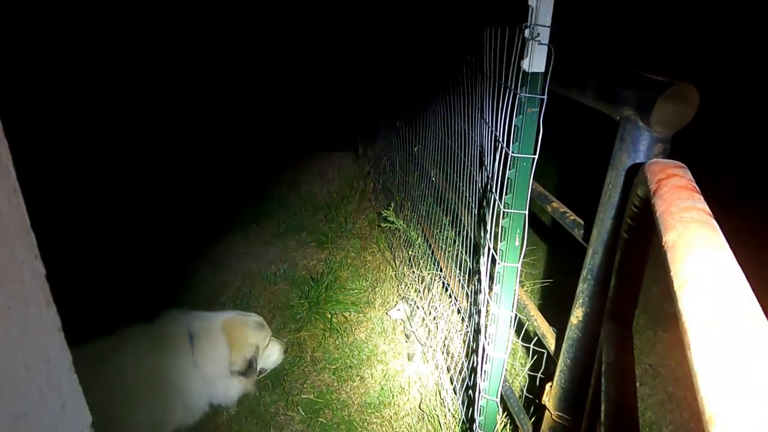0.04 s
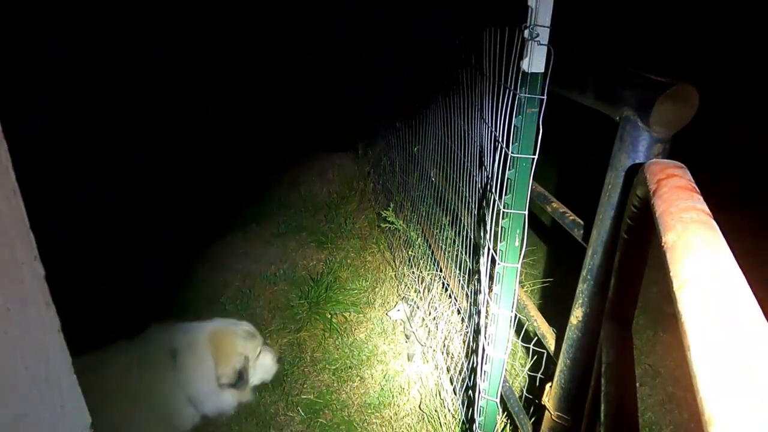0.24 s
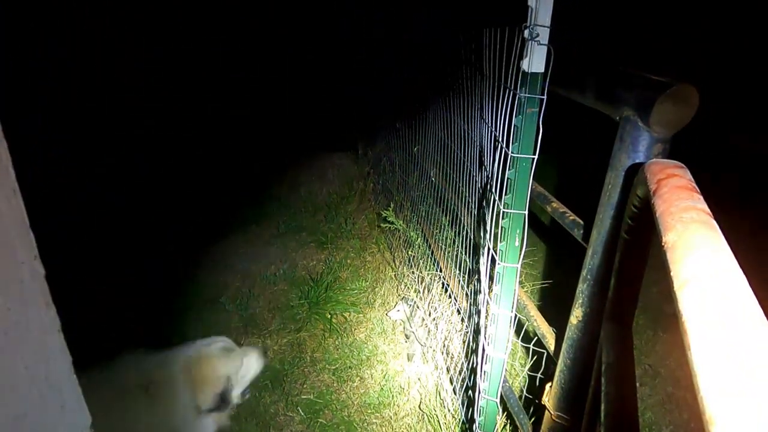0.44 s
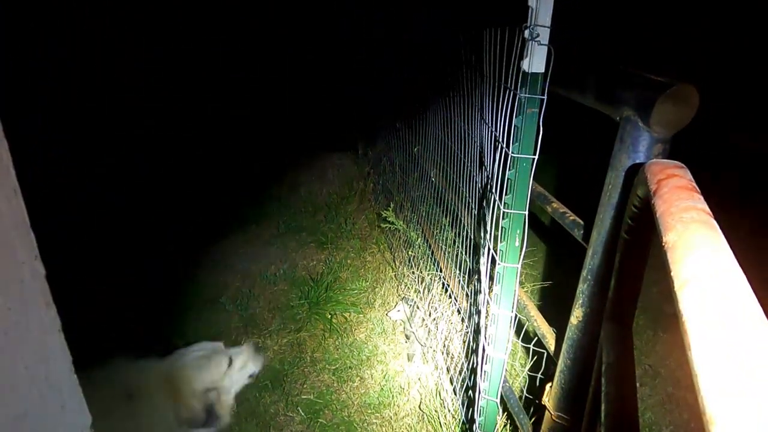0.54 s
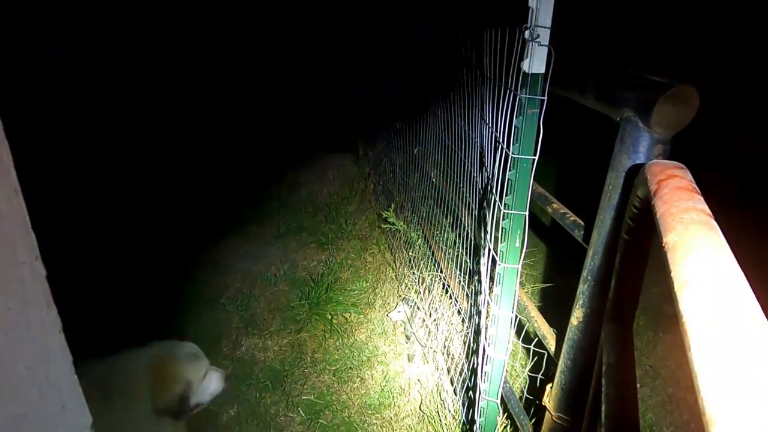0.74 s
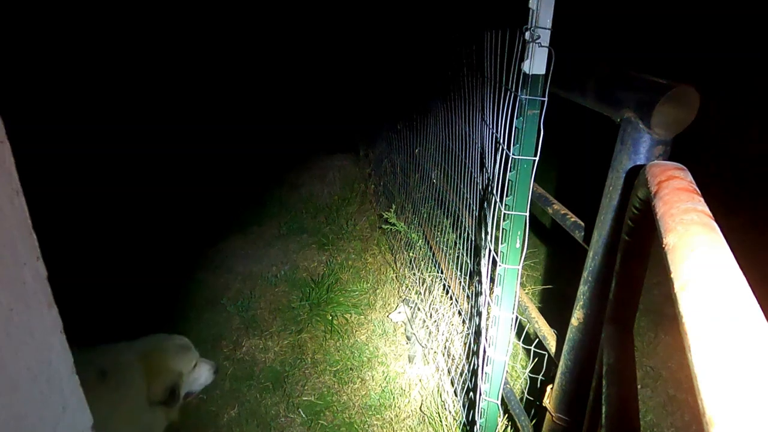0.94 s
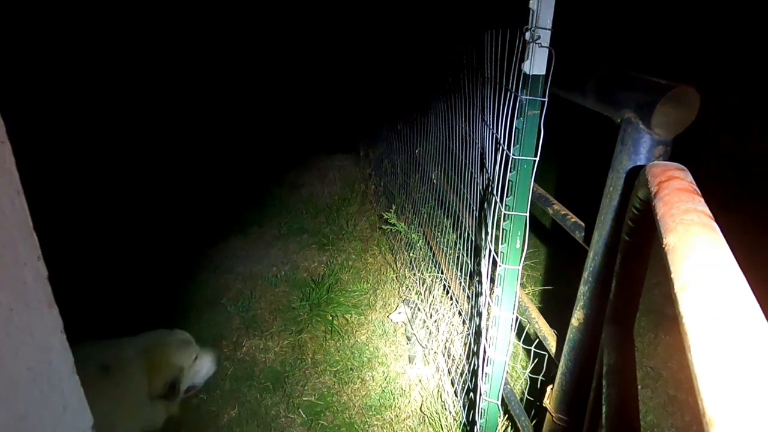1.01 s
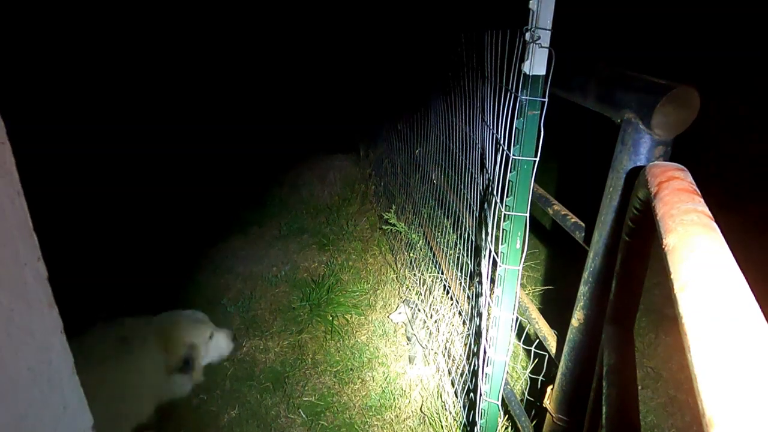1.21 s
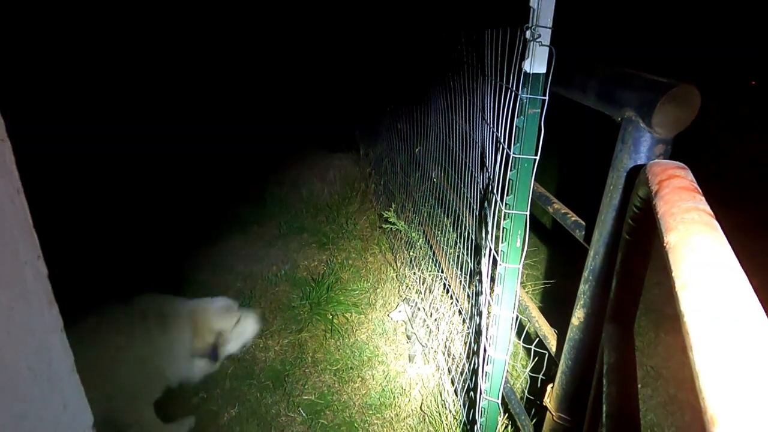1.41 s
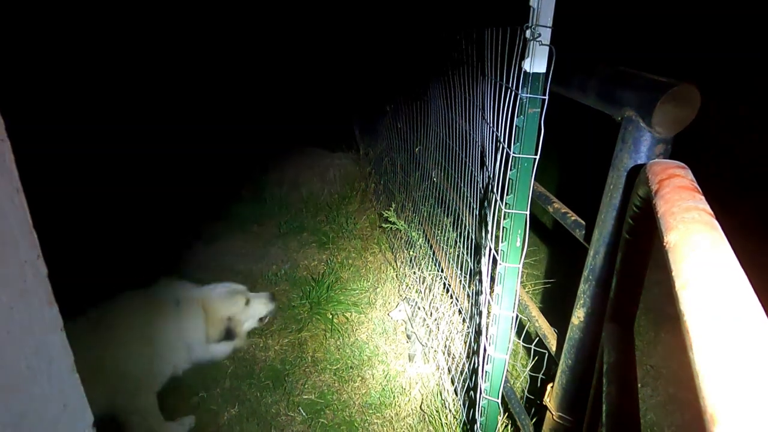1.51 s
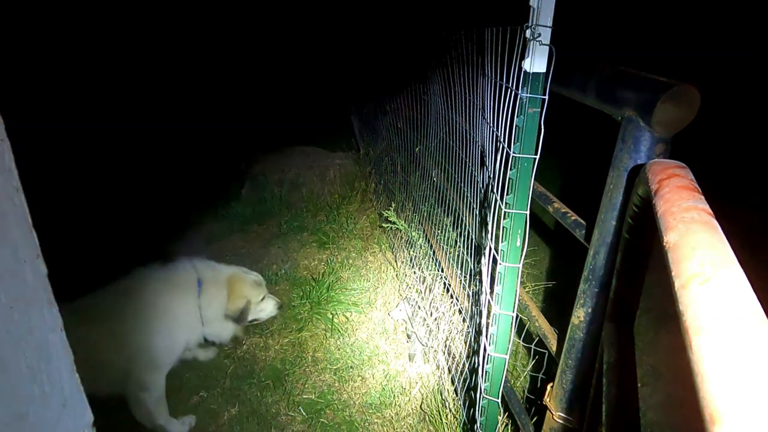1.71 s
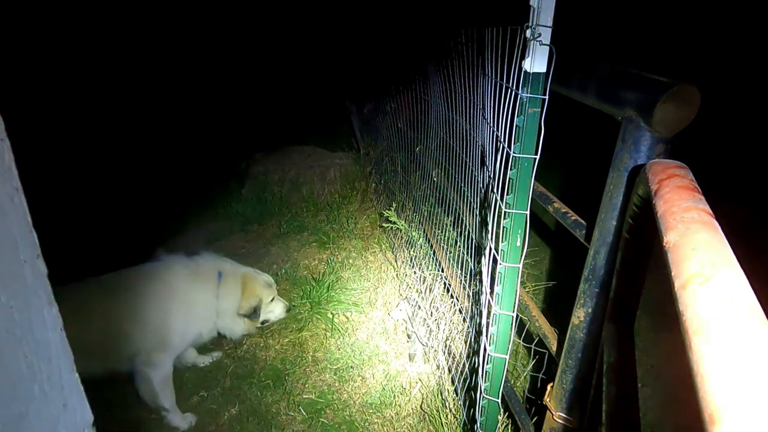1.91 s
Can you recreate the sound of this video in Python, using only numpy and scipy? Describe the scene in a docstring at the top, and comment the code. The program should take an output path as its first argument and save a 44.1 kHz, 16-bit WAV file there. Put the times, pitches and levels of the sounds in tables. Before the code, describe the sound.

A large dog barks four times, growling softly in between, in a yard at night.

```python
"""A large dog barks twice, then twice more, just left of the microphone in a yard at night.
In each bark the voice splits into up to three unrelated tones with a rasp around them;
between and after the barks the vocal folds go slack and it sinks to a soft growl.
Far walls return echoes, a few small ticks come from the fence or the ground,
and the air rumbles faintly behind it all."""
import sys
import numpy as np
from scipy import signal
from scipy.fft import rfft, irfft
from scipy.io import wavfile
from scipy.ndimage import uniform_filter1d

SR = 44100
rng = np.random.default_rng(int(sys.argv[2]) if len(sys.argv) > 2 else 0)


def to_wav(s):
    """Save 16-bit WAV."""
    ch = np.atleast_2d(s).T  # columns
    pcm = np.round(np.clip(ch, -1, 1) * 32767)  # PCM
    wavfile.write(sys.argv[1], SR, pcm.astype(np.int16))


N = 85995
TIME = np.arange(N) / SR

# The open mouth in each bark. Each row: seconds when open and when closing, the bright edge's relative
# dB at those two moments, mouth resonance in Hz, its gain in dB, upper throat resonance in dB against
# the top tone (at zero roughness), bright echo in dB.
MOUTHS = [ (0.227, 0.284, -51.5, -47.5, 3100, 9, -8, -38), (0.556, 0.632, -40, -44, 2592, 2.5, -16, -23),
          (1.174, 1.245, -46, -41.5, 2412, 6, -22, -11.5), (1.537, 1.646, -45, -51.5, 4340, 0, -14.5, -19),
          ]


def dog():
    """Four barks and four growls from one spot, a little left of the microphone."""
    # One table a bark. Each row: time in seconds, low, middle and top tone in Hz, roughness from 0 to 1,
    # low, middle and top tone in dB.
    voices = [
        [(.153, 330, 551.3, 1040, 0.59, -50.5, -42.5, -58), (.182, 376.5, 589.4, 1033, 1, -34, -45, -47),
         (.21, 402.7, 724.4, 962, 0.15, -17, -39.5, -40), (.24, 580.6, 902.4, 1141, 0.25, -26, -47.5, -22),
         (.262, 593, 1011, 1196, 0.16, -26, -40.5, -20.5), (.285, 576.5, 725, 1175, 0.37, -20, -27.5, -28.5),
         (.30, 505, 632, 1106, 0.2, -18.5, -29.5, -22.5), (.314, 414, 792, 924, 0.31, -13.5, -36, -35.5),
         (.35, 293, 625, 1138, 0.7, -38.5, -48, -51.5)],
        [(.492, 343.9, 562, 901.3, 0.35, -31.5, -43, -53.5), (.516, 402, 531.6, 1096, .25, -15, -23, -29),
         (.545, 437.4, 684.4, 1350, 0.43, -19.5, -31.5, -20.5),
         (.567, 475.5, 821.7, 1313, 0.39, -21.5, -19.5, -25), (.595, 459, 812.3, 1347, 0.33, -30.5, -15, -26),
         (.612, 455.1, 824.5, 1212, 0.32, -15, -16.5, -23.5), (.64, 454.4, 821, 1133, 0.25, -15, -19.5, -19.5),
         (.657, 434, 721, 1142, 0.24, -10, -21.5, -29.5), (.678, 405.5, 781, 1188, 0.38, -10, -23, -30.5),
         (.698, 330, 747, 1090, 0.6, -24.5, -44, -61)],
        [(1.12, 343.9, 577, 1112, 0.75, -49.5, -51, -52), (1.133, 375.6, 571, 1216, 0.6, -34.5, -41.5, -46.5),
         (1.146, 422.4, 592, 1220, 0.35, -14.5, -31.5, -28.5), (1.162, 425, 598.7, 1206, 0.7, -24.5, -19, -23),
         (1.172, 476.1, 683.3, 920, 0.25, -22.5, -21.5, -21),
         (1.215, 460.7, 682, 922.4, 0.2, -24.5, -17.5, -18), (1.247, 461, 653, 1026, 0.19, -31, -15, -19),
         (1.29, 449.2, 694, 1047, 0.72, -19.5, -24, -36.5), (1.33, 286.4, 602, 1094, 0.7, -33, -43, -47)],
        [(1.495, 298, 700, 1110, 0.86, -33, -34, -58), (1.52, 307.4, 667.2, 1238, 0.73, -29, -37.5, -45.5),
         (1.535, 366.1, 623.2, 1268, 0.76, -27, -20, -27), (1.555, 415.2, 654.4, 1036, 0.71, -16, -20, -26.5),
         (1.578, 416.8, 692, 1114, 0.29, -13, -20, -23.5), (1.612, 430, 640.4, 1063, 0.26, -15.5, -16.5, -29),
         (1.643, 416.6, 634.7, 1064, 0.23, -16, -18.5, -29), (1.66, 344, 667, 977, 0.33, -20, -46, -38),
         (1.685, 264, 554, 1090, 0.03, -43.5, -38, -49.5)],
    ]
    # One table a growl. Each row: time in seconds, pitch in Hz, level in dB.
    growl_curves = [
        [(.32, 170, -50), (.345, 146, -30), (.40, 112, -35), (.44, 112.7, -31.5), (.475, 138, -36),
         (.50, 147, -46.5)],
        [(.685, 170.6, -43), (.715, 129.3, -32.5), (.75, 90.6, -39), (.79, 80.2, -43), (.835, 69, -57.5)],
        [(1.29, 173, -41.5), (1.32, 141.4, -33), (1.35, 100, -33.5), (1.38, 88.3, -37.5), (1.42, 107.3, -36.5),
         (1.475, 137.5, -34), (1.52, 196.6, -30)],
        [(1.665, 184.1, -45.5), (1.695, 165.5, -31), (1.74, 107.9, -38.5), (1.78, 77, -42.5), (1.82, 73, -62)],
    ]
    each_bark = [bark(voice, *row[:-1]) for voice, row in zip(voices, MOUTHS)]
    barks, buzz, bark_air, ring = np.sum(each_bark, axis=0)
    growls, growl_air = np.sum([growl(curve) for curve in growl_curves], axis=0)
    pan = from_db([[0.5], [-0.5]])
    return (barks + growls + mouth(buzz, bark_air + growl_air, ring)) * pan


def bark(voice, open_s, close_s, open_db, close_db, mouth_hz, mouth_db, upper_db):
    """Three unsteady tones chop the airflow, which rings the throat and gates rasp; closing folds buzz."""
    # Rasp around each tone. Each row: low and high edge in Hz, weight of the noise.
    rasp_bands = [(348.5, 531, 0.92), (550, 900, 1), (870, 1372, 3)]
    jitter, shimmer, flutter_hz = 0.03575, 0.2, 117.5
    upper_band_hz, mouth_width_hz = (1630, 1953), 487
    *pitches, rough, low_db, middle_db, top_db = in_time(voice)
    rough, sounding = np.clip(rough, 0, 1), during(voice)
    gains = [from_db(db) * sounding for db in (low_db, middle_db, top_db)]
    phases = [phase_of(hz * (1 + jitter * rough * drift(flutter_hz))) for hz in pitches]
    tones = [np.sqrt(2) * np.sin(phase) for phase in phases]
    flow = np.exp(0.74 * even(sum(gain * tone for gain, tone in zip(gains, tones))))

    combination_tones = band(tones[1] * (tones[0] + tones[1]), 950, 1340)
    tones[2] = tones[2] + from_db(-11.5) * combination_tones
    throat = np.zeros(N)
    for gain, tone, rasp_band in zip(gains, tones, rasp_bands):
        unsteady = tone * (1 + shimmer * rough * drift(flutter_hz))
        throat += gain * rasp(unsteady, flow, rough, *rasp_band)
    upper_gain = gains[2] * from_db(upper_db + 10 * rough)  # a rougher voice is brighter
    throat += upper_gain * rasp(band(flow, *upper_band_hz), flow, rough, *upper_band_hz, weight=1.4)

    # One sharp pulse a cycle from the two lower tones; the faster-closing fold dominates.
    closures = sum((gain * hz) ** 2 * np.exp(70 * (np.cos(phase) - 1))
                   for gain, hz, phase in zip(gains[:2], pitches, phases))
    edge = gape(open_s, close_s, open_db, close_db)
    air_share = np.clip(2.27 * rough, 0, 1)
    buzz = edge * sounding * np.sqrt(1 - air_share ** 2) * even(band(closures, 1500, 9000))
    air = edge * air_share * even(flow)
    breath = buzz + 2 * air * rng.standard_normal(N) + 1e-18
    ring = from_db(mouth_db) * band(breath, mouth_hz - mouth_width_hz / 2, mouth_hz + mouth_width_hz / 2)
    return throat, buzz, air, ring


def rasp(tone, flow, rough, low_hz, high_hz, weight):
    """As the voice roughens, a tone gives way to noise gated by the airflow."""
    share = np.clip(weight * rough ** 1.5, 0, 1)
    turbulence = band(flow * rng.standard_normal(N), low_hz, high_hz)
    return np.sqrt(1 - share ** 2) * even(tone) + share * even(turbulence)


def gape(open_s, close_s, open_db, close_db):
    """The bark's bright edge swells as the mouth opens, holds, and fades as it closes."""
    open_db_per_s, close_db_per_s = 341.5, 233.5
    held_db = np.interp(TIME, [open_s, close_s], [open_db, close_db])
    opening_db = open_db_per_s * np.maximum(open_s - TIME, 0)
    closing_db = close_db_per_s * np.maximum(TIME - close_s, 0)
    return from_db(held_db - opening_db - closing_db)


def mouth(buzz, air, ring):
    """Buzz, turbulent air and the mouth's ringing leave between the jaws."""
    # The mouth's filter. Each row: frequency in Hz, gain in dB.
    mouth_colour = [(1240, -42), (2050, 5), (2700, -0.5), (4300, 4), (5690, -1), (12100, -26),
                    (14300, -61.5)]
    mid, side = 2 * air * rng.standard_normal((2, N))
    centre = scatter(buzz + mid) + ring
    width = 0.42 * scatter(side) * np.array([[1], [-1]])  # turbulence differs between left and right
    return shaped(centre + width, mouth_colour)


def scatter(x):
    """Short paths past the moving jaw and tongue: uneven resonances that come and go."""
    longest_s, movement_hz, share = 0.0035, 15.6, 0.55
    paths = sum(drift(movement_hz) * np.interp(TIME - s, TIME, x) for s in rng.uniform(0, longest_s, 7))
    return (x + share * paths) / np.sqrt(1 + 7 * share ** 2)


def growl(curve):
    """Slack folds: a strong fundamental, weak overtones and a puff of air each cycle."""
    # The throat's overtones. Each row: frequency in Hz, dB against the fundamental.
    throat = [(160, -10.5), (240, -29.5), (350, -9.5), (450, -10.5), (700, -28), (1100, -28), (2000, -47.5)]
    jitter, shimmer = 0.0501, 0.25
    hz, db = in_time(curve)
    phase = phase_of(hz * (1 + jitter * drift(54)))
    gain = from_db(db) * during(curve) * (1 + shimmer * drift(70))
    overtones = sum(at_hz(throat, k * hz) * np.cos(k * phase + rng.uniform(0, np.pi))
                    for k in range(2, 15))
    puffs = gain * from_db(-34) * (1 + 0.5 * np.cos(phase))
    return gain * np.sqrt(2) * (np.cos(phase) + overtones), puffs


def yard(x):
    """Scatter from the ground and fence close by, a slower tail, and the echoes of far walls."""
    # What comes back from a distance. Each row: frequency in Hz, gain in dB.
    far_colour = [(100, -15), (430, -14), (1100, 0.5), (1500, -7.5), (2150, 14.5), (2800, 0), (5000, 2.5),
                  (10000, -25)]
    # The walls. Each row: echo delay in seconds, gain in dB on top of that colour.
    walls = [(.1625, -24), (.1662, -34), (.345, -40.5)]
    near_t60_s, tail_t60_s, build_s = 0.11, 0.45, 0.19
    mono = x.mean(axis=0)
    far = shaped(mono, far_colour)
    build = np.minimum(TIME / build_s, 1) ** 2
    reverb = []
    for channel in x:
        near = from_db(-20) * rms_one(rng.standard_normal(N) * from_db(-60 * TIME / near_t60_s))
        tail = from_db(-22) * rms_one(rng.standard_normal(N) * from_db(-60 * TIME / tail_t60_s) * build)
        reflected = signal.fftconvolve(channel, near) + signal.fftconvolve(far, tail)
        reverb.append(reflected[:N] / np.sqrt(N))
    echoes = sum(from_db(db) * delayed(far, s) for s, db in walls)
    # The nearer echo returns brighter when the dog faces the wall.
    facing_db, = in_time([(s, row[-1]) for row in MOUTHS for s in row[:2]])
    bright = from_db(facing_db) * band(mono, 1940, 4340)
    return np.array(reverb) + echoes + delayed(bright, walls[1][0])


def ticks():
    """Small dry ticks from the fence or the ground, each a few milliseconds long."""
    # Each row: start in seconds, relative level in dB.
    events = [(0.9148, -50), (0.9601, -54.5), (1.02, -54)]
    # Each row: frequency in Hz, relative level in dB.
    tick_colour = [(1000, 1), (5700, -9), (13000, -42)]
    decay_s = 0.0039
    envelope = sum(from_db(db - 1) * (TIME >= s) * np.exp(-np.abs(TIME - s) / decay_s) for s, db in events)
    return envelope * noise(tick_colour)


def night():
    """Faint outdoor air around the microphone, over an uneven low rumble."""
    # Spectra of the still air and the rumble. Each row: frequency in Hz, relative level in dB.
    air_colour = [(35, -34.5), (150, -1), (260, -12), (1100, -20), (2300, -36.5), (7000, -41.5),
                  (12000, -64.5)]
    rumble_colour = [(18, -4.5), (60, 6.5), (300, -47)]
    # The rumble's rise and fall. Each row: time in seconds, level in dB.
    swells = [(.1, -66.5), (.24, -42), (.55, -55.5), (.8, -56), (.9, -75), (.96, -52.5), (1.93, -75)]
    mid, side = noise(air_colour), noise(air_colour)
    rumble = from_db(in_time(swells)[0]) * even(noise(rumble_colour), size=3000)
    return rumble + from_db(-57.5) * (mid + 0.15 * side * np.array([[1], [-1]]))


def from_db(db):
    """Decibels to gain."""
    return 10 ** (np.asarray(db) / 20)


def rms_one(x):
    """Scale to unit power."""
    return x / np.sqrt(np.mean(x ** 2) + 1e-20)


def even(x, size=700):
    """Hold the power at one over a window of this many samples."""
    return x / np.sqrt(np.abs(uniform_filter1d(x * x, size)) + 1e-12)


def in_time(rows):
    """Each column of a curve, at every sample."""
    s, *columns = np.transpose(rows)
    return [np.interp(TIME, np.sort(s), column) for column in columns]


def during(rows, fade_s=0.0032):
    """One while a curve lasts, fading outside it."""
    outside_s = np.maximum(0, np.maximum(rows[0][0] - TIME, TIME - rows[-1][0]))
    return np.exp(-(outside_s / fade_s) ** 2)


def phase_of(hz):
    """Running phase of a changing pitch."""
    return 2 * np.pi * np.cumsum(hz) / SR


def delayed(x, s):
    """The same sound, s seconds later."""
    return np.interp(TIME - s, TIME, x, left=0)


def at_hz(points, hz):
    """Gain of a spectrum at these frequencies."""
    point_hz, db = np.transpose(points)
    return from_db(np.interp(np.log(hz + 1e-3), np.log(point_hz), db))


def shaped(x, points):
    """Filter a sound by this spectrum."""
    return irfft(rfft(x) * at_hz(points, np.fft.rfftfreq(N, 1 / SR)), N)


def noise(points):
    """Noise with this spectrum, at unit power."""
    return rms_one(shaped(rng.standard_normal(N), points))


def band(x, low_hz, high_hz):
    """A steep band-pass: one filter applied twice."""
    sos = signal.butter(2, [low_hz, high_hz], "band", fs=SR, output="sos")
    return signal.sosfilt(sos, signal.sosfilt(sos, x))


def drift(hz):
    """Random wander below this rate, with unit spread."""
    return rms_one(signal.sosfilt(signal.butter(2, hz, fs=SR, output="sos"), rng.standard_normal(N)))


def scene():
    """At the microphone: the dog, the yard's answer, ticks and night air."""
    direct = dog()
    return direct + yard(direct) + ticks() + night()


def record(dry):
    """A steep low-pass cuts the highest treble."""
    cutoff_hz = 15200
    return signal.sosfilt(signal.cheby2(12, 70, cutoff_hz, fs=SR, output="sos"), dry)


dry = scene()
out = record(dry)
to_wav(out)
```